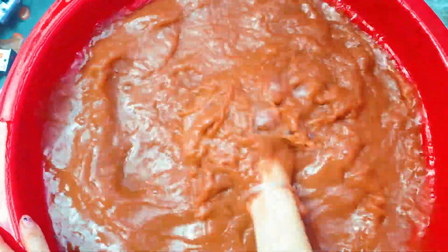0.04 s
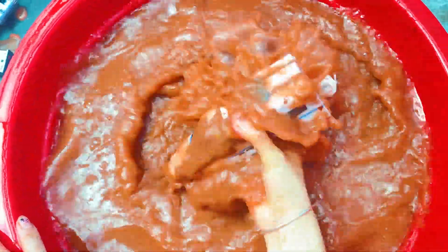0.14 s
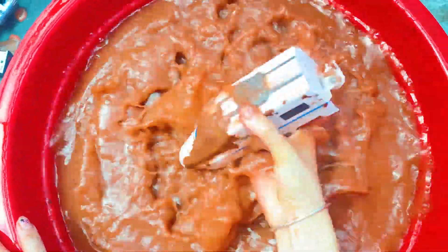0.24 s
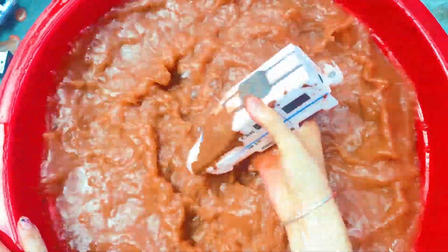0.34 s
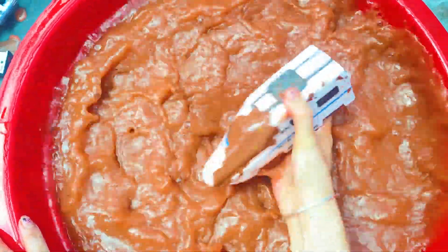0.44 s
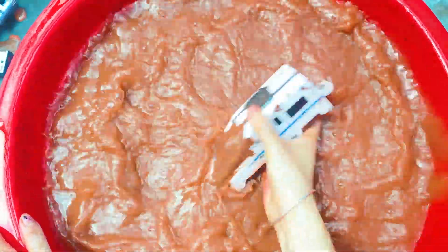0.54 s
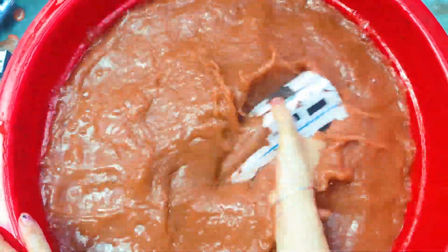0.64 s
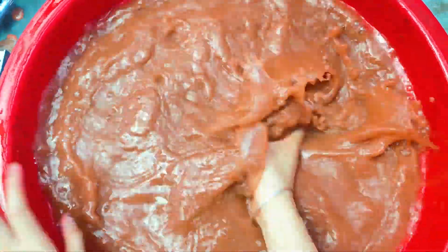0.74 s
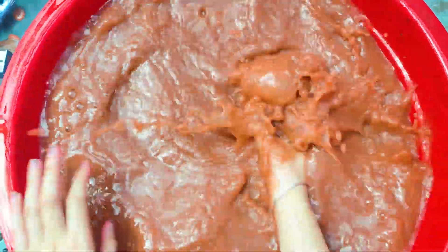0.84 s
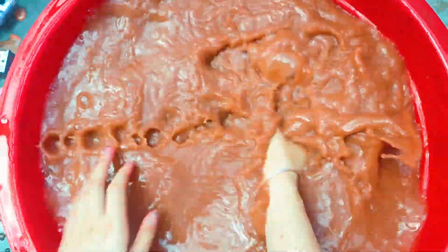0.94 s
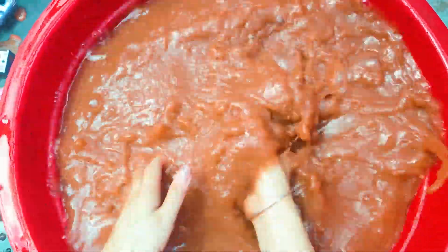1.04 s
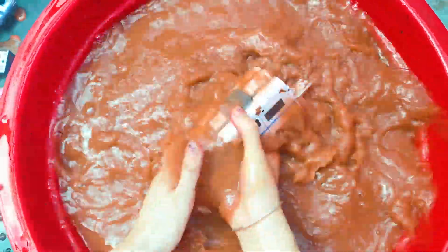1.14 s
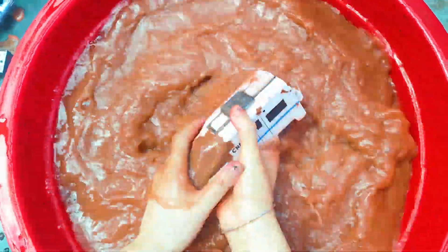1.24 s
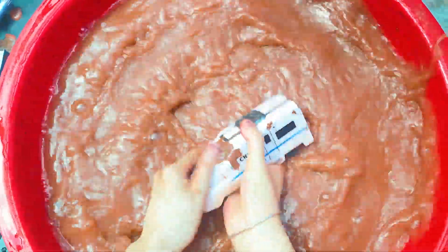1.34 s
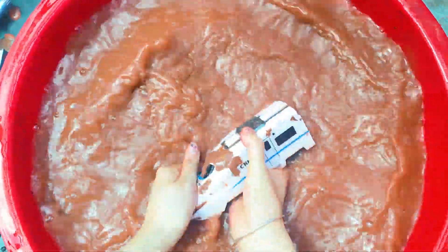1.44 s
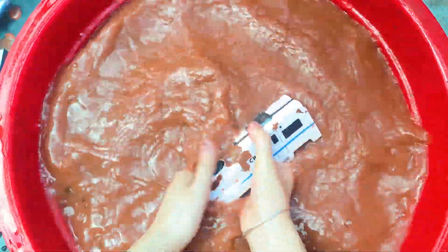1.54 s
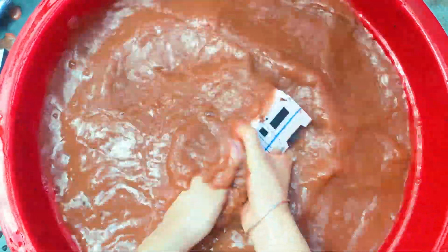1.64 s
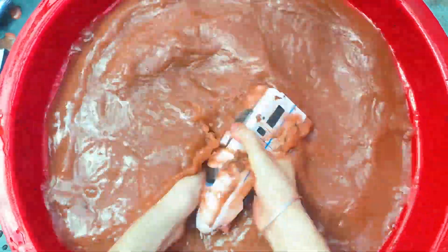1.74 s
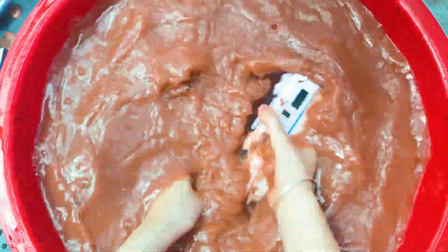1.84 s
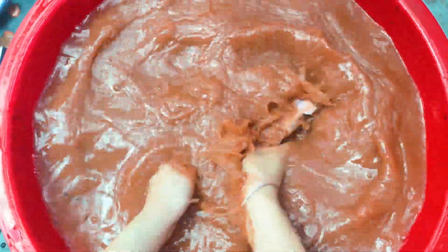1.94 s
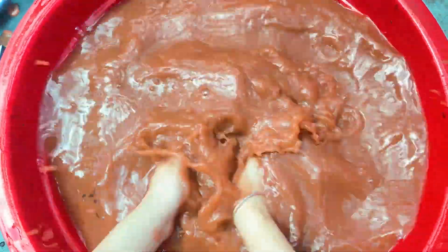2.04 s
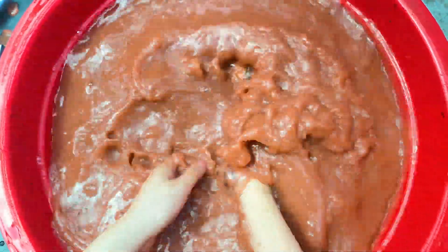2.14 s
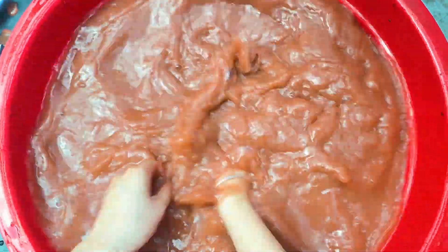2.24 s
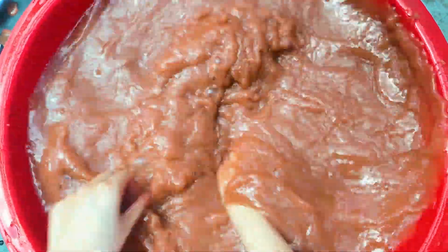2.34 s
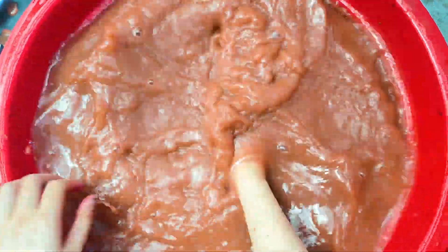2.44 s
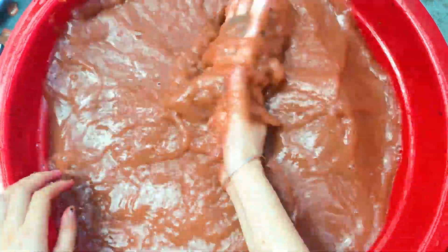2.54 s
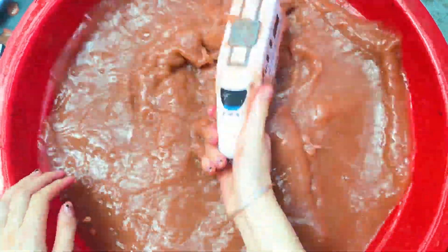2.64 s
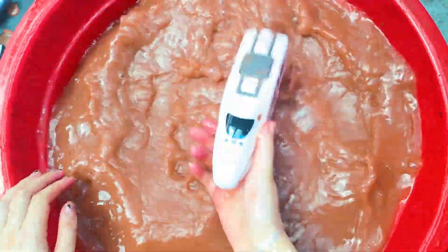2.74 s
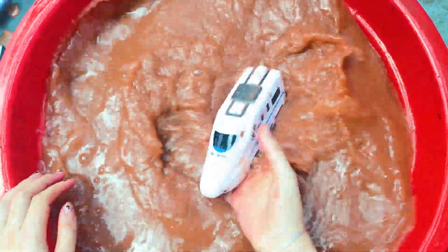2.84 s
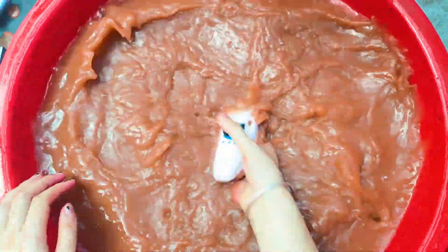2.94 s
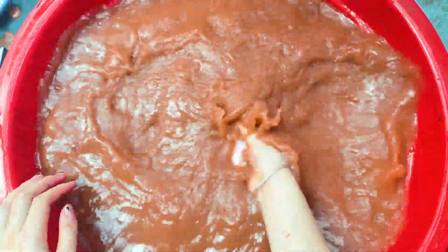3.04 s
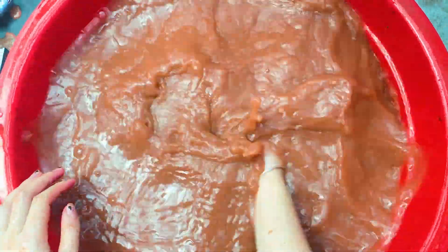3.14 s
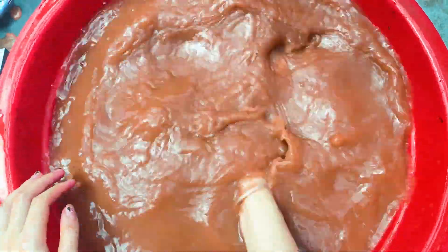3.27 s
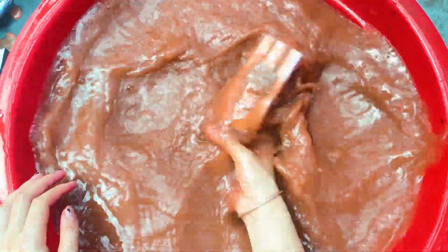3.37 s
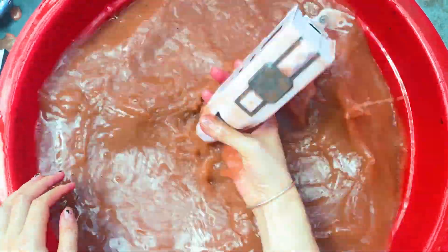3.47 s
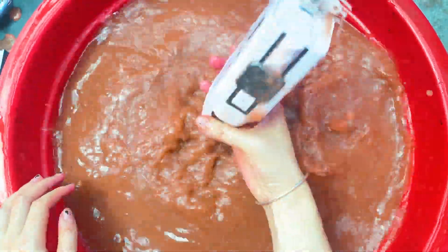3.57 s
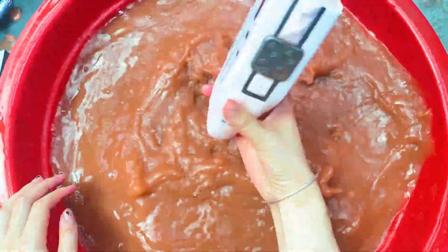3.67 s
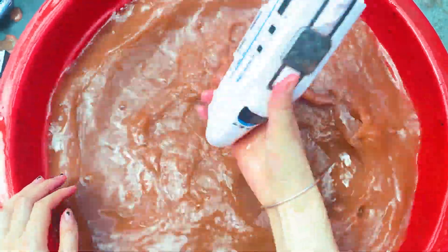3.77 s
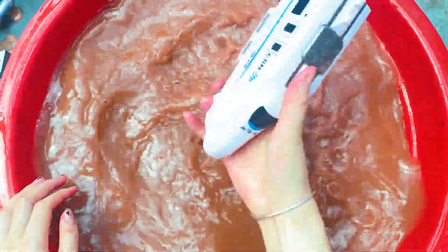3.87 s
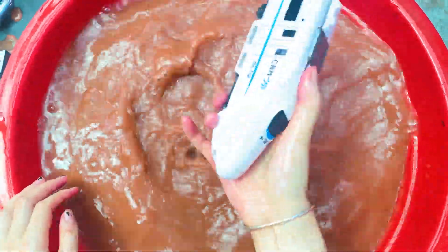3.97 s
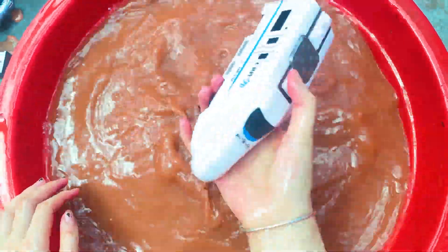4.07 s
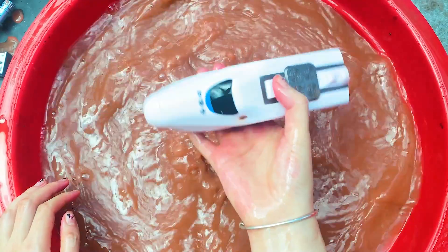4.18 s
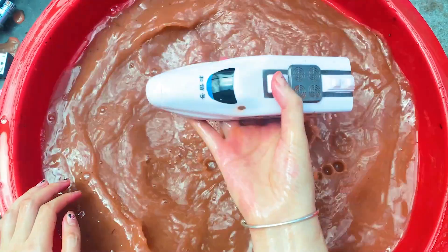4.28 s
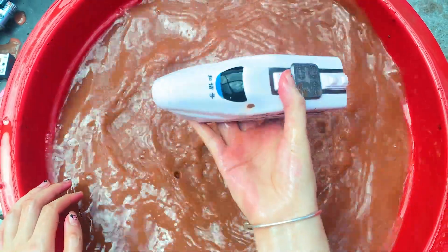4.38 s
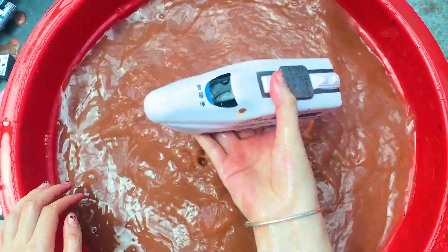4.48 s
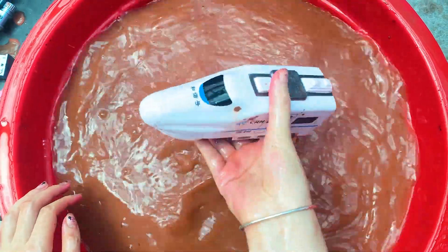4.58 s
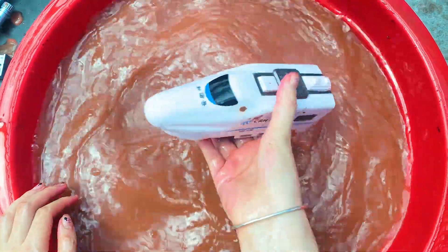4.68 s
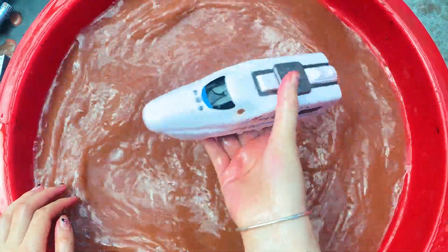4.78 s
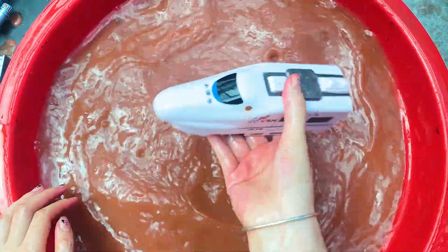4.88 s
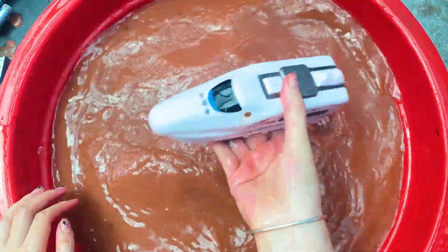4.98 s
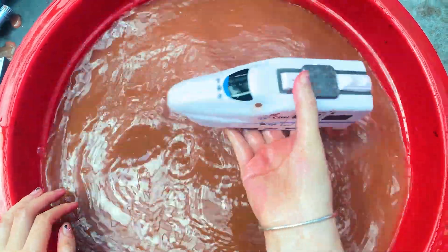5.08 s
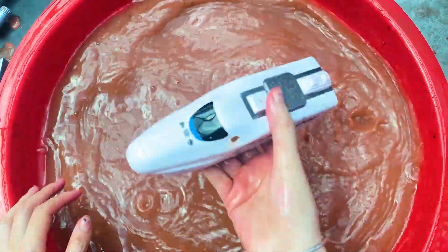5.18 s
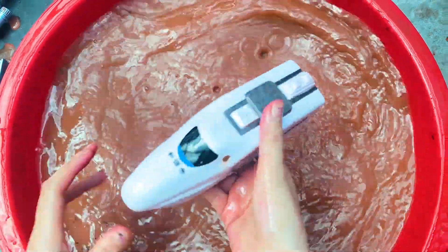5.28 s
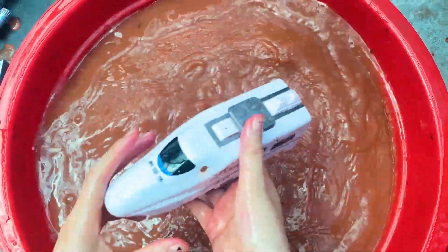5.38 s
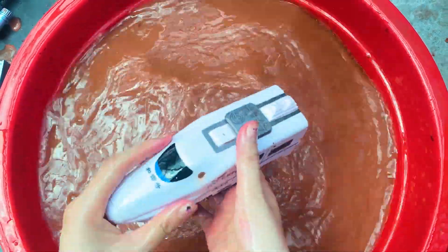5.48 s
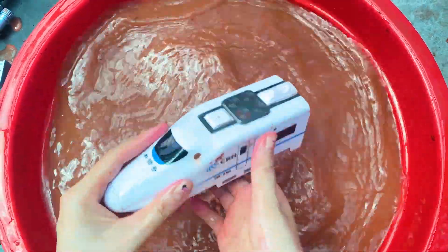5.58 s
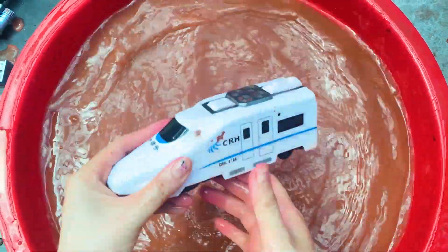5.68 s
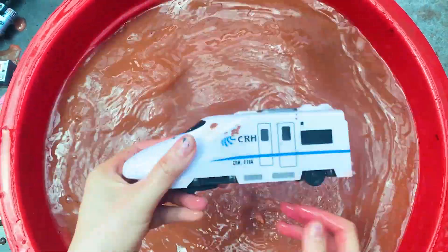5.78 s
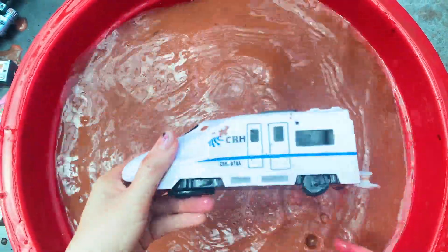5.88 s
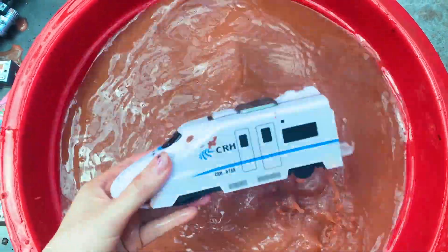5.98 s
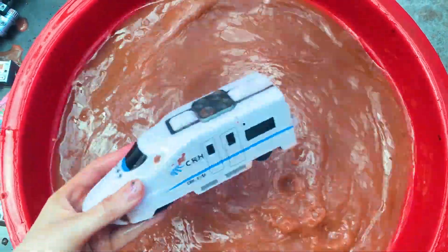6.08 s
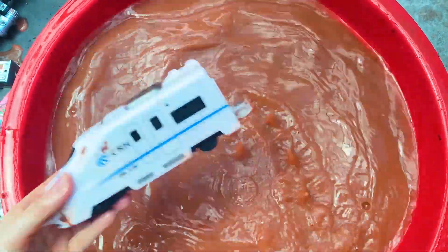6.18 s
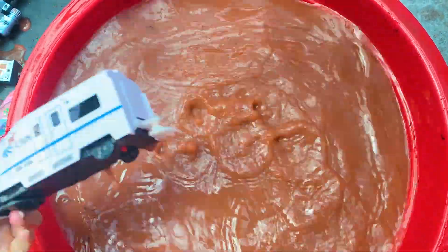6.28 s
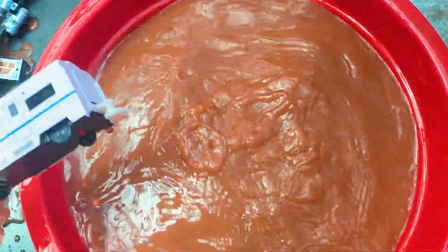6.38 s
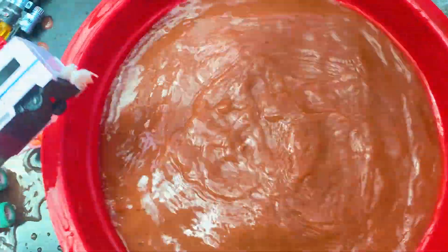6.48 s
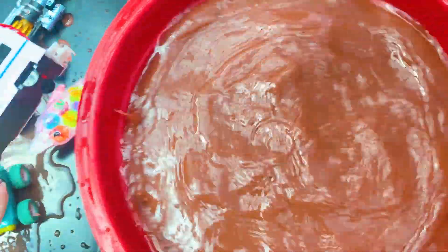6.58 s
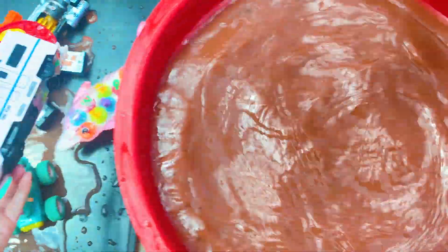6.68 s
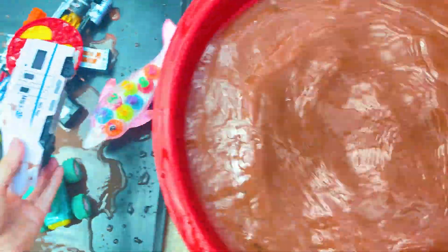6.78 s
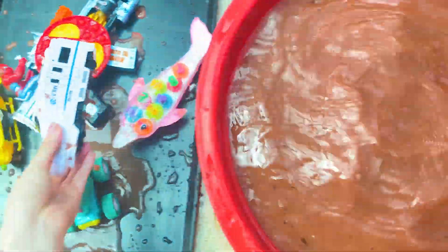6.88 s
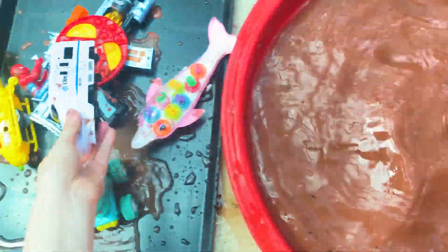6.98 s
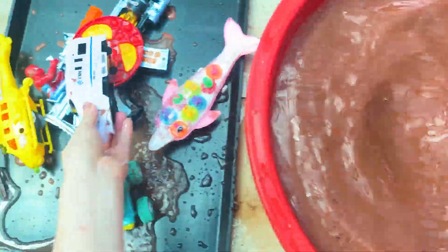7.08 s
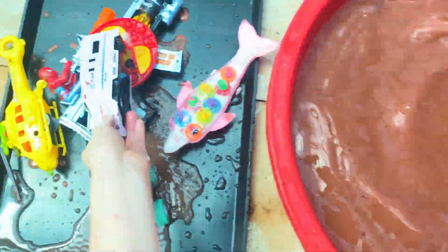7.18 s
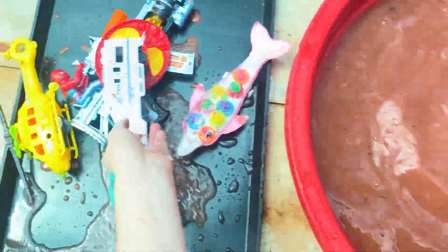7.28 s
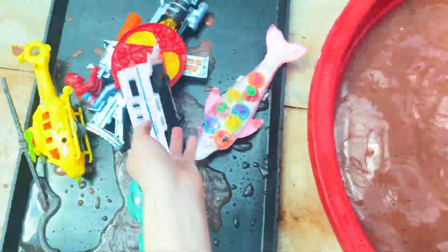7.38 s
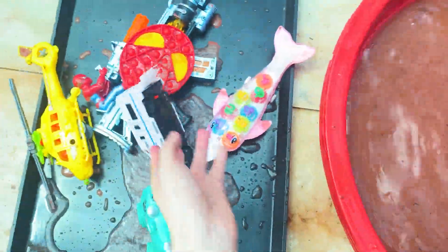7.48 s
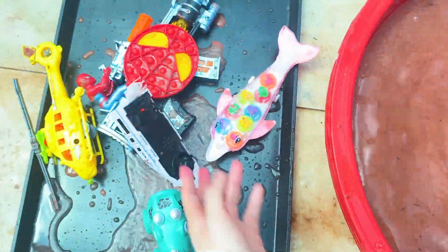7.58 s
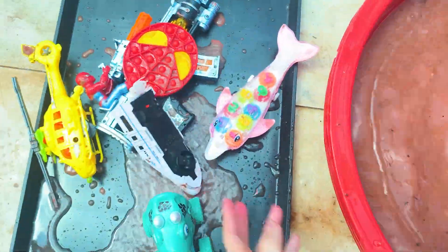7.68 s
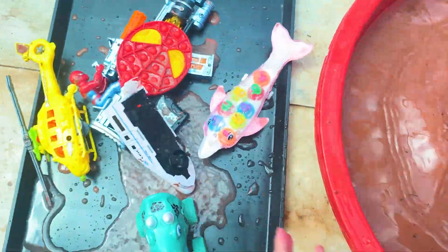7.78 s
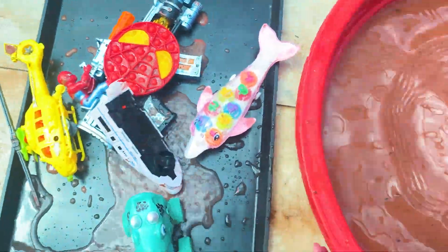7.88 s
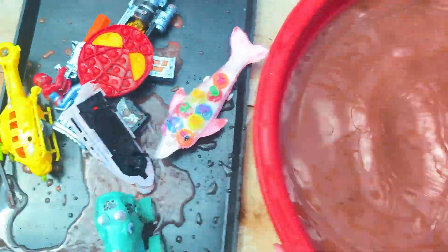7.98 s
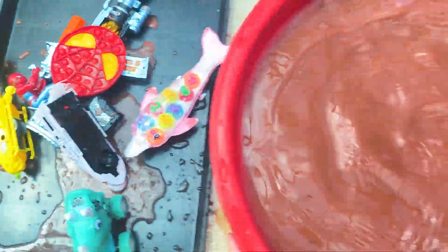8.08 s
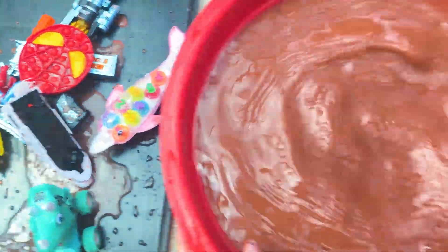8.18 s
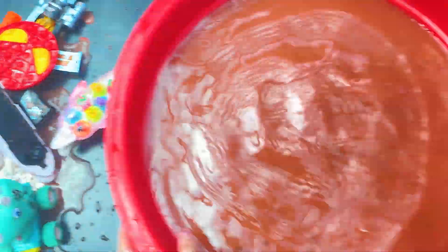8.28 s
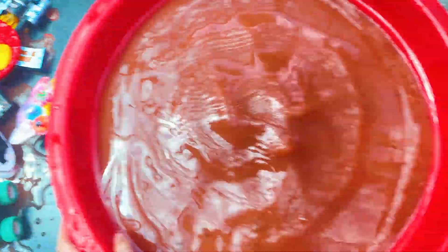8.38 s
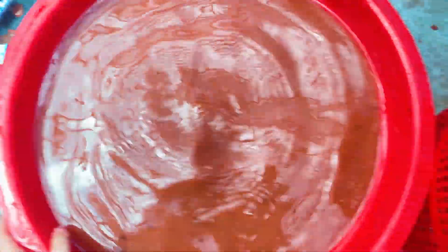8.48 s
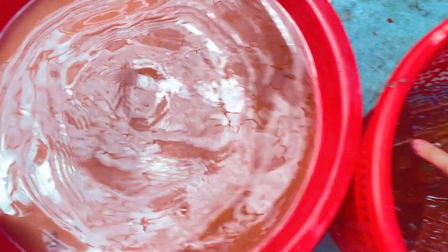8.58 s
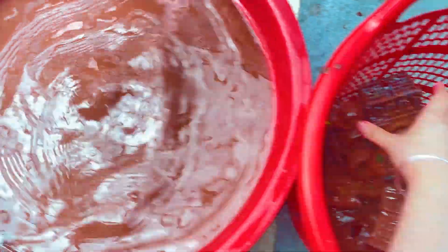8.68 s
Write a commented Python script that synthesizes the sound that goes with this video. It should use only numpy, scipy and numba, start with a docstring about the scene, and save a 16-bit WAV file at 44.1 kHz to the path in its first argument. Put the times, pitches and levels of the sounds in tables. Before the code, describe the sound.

Hands swish a hollow plastic toy through muddy water in a basin, making quick bursts of splashing, gurgling and fine spray. The toy is lifted and drains with a brief falling tone, and the sloshing thins into scattered drips and plinks. Near the end it is set among other toys on a hard tray with several light knocks. The sound is close, in a small hard room, with a faint motor droning far off.

```python
"""Small hard room, two close microphone ports. Hands swish a hollow plastic toy through muddy water in
a basin, lift it so it drains and drips, and set it down among other toys on a hard tray.
Trapped air rings as rising bubbles, drops plink, spray ticks. The emptying toy gives a falling tone;
knocks ring shell and tray modes. A motor drones far off."""
import sys
import numpy as np
from scipy import signal
from scipy.fft import rfft, irfft, next_fast_len
from scipy.io import wavfile
from numba import njit

SR = 44100
rng = np.random.default_rng(int(sys.argv[2]) if len(sys.argv) > 2 else 0)


def output_pcm(signal):
    """Save a mono or channel-first signal as 16-bit PCM at the path in sys.argv[1].

    Samples are clipped to [-1, 1] before scaling.
    """
    pcm = np.clip(np.atleast_2d(signal).T, -1, 1) * 32767
    wavfile.write(sys.argv[1], SR, np.round(pcm).astype(np.int16))


N = 384552

# Table levels are relative; each source adds its own gain.
# far rumble and air: (frequency [Hz], density [dB])
RUMBLE_SPECTRUM = [(24, -57), (40, -21.5), (101, -6.5), (297, -20), (585, -25.5), (697, -30), (751, -31.5),
                   (2700, -42.5), (9690, -60), (13800, -61), (16000, -68.5)]
# rumble width: (frequency [Hz], side minus mid [dB])
RUMBLE_WIDTH = [(60, -15), (250, -8.5), (1000, 3), (4000, -2)]
# motor drone: (frequency [Hz], rms level [dB])
MOTOR_LINES = [(49, -83.5), (62, -62.5), (98, -60), (147, -66), (195, -76)]
# hand and toy strokes: (start [s], hold [s], gurgle [dB], gurgle pitch [Hz], splash [dB], spray [dB])
STROKES = [(0.0, 0.11, -45, 492, -46, -50), (.17, 0.047, -41.5, 710, -40, -44),
           (.235, 0.051, -47.5, 720, -43.5, -56), (.28, 0.11, -45, 740, -35, -39.5),
           (0.522, 0.063, -39.5, 634, -38.5, -37), (0.658, 0.16, -50.5, 517, -44, -50),
           (.83, 0.19, -38.5, 646, -43, -43), (1.16, 0.19, -58.5, 766, -48.5, -55),
           (1.36, 0.16, -67.5, 700, -59.5, -55), (1.6, 0.31, -58.5, 497, -61, -61),
           (1.825, 0.024, -50.5, 604, -39.5, -42.5), (1.875, 0.032, -45.5, 500, -41, -33.5),
           (1.95, 0.074, -43.5, 623, -41.5, -44), (2.039, 0.06, -48.5, 790, -64, -74),
           (2.19, 0.062, -39, 523, -50, -48.5), (2.448, 0.2, -50, 894, -56, -52.5),
           (2.719, 0.1, -49, 940, -49.5, -41), (2.849, 0.08, -61.5, 500, -46, -40.5),
           (2.96, 0.08, -59.5, 504, -54, -48.5), (3.1, 0.26, -77, 1200, -92, -64),
           (3.442, 0.21, -55, 418, -47.5, -46.5), (3.71, 0.42, -61.5, 844, -41, -43),
           (4.02, 0.16, -52, 580, -50.5, -47), (4.24, 0.042, -54.5, 604, -52.5, -52),
           (4.371, 0.12, -64.5, 950, -56, -49), (4.55, 0.036, -53.5, 900, -55.5, -60),
           (4.72, 0.074, -56, 1090, -76, -62), (4.82, 0.1, -43.5, 960, -64, -54),
           (5.021, 0.083, -64.5, 800, -76, -65.5), (5.21, 0.024, -55, 912, -79, -73),
           (5.401, 0.099, -73, 1180, -79, -57.5), (5.869, 0.063, -59.5, 860, -89, -74),
           (6.0, 0.11, -60, 1040, -69, -80), (6.301, 0.21, -65, 1037, -76, -93),
           (6.997, 0.087, -65.5, 990, -72.5, -66.5), (7.252, 0.07, -57, 1040, -57.5, -81)]
# spray colour: (frequency [Hz], density [dB])
SPRAY_SPECTRUM = [(2500, -19), (4000, 0), (6000, 4.5), (8500, 14), (10500, 13), (12500, 12.5),
                  (15500, 16.5), (16200, -9), (17000, -12.5)]
# large air pockets: (time [s], level [dB], pitch [Hz], life [s])
AIR_POCKETS = [(0.029, -12.5, 482, 0.031), (0.178, -20.5, 548, 0.037), (0.205, -12.5, 720, 0.024),
               (0.254, -29, 742, 0.058), (0.3, -27.5, 692, 0.053), (0.4, -27.5, 335, 0.044),
               (0.479, -29.5, 490, 0.025), (0.518, -28.5, 490, 0.03), (0.561, -22, 944, 0.012),
               (0.646, -26, 497, 0.064), (0.745, -23.5, 537, 0.035), (0.76, -27.5, 262, 0.021),
               (0.821, -32, 503, 0.023), (0.848, -29.5, 377, 0.082), (0.896, -19.5, 628, 0.029),
               (0.95, -26.5, 420, 0.021), (0.975, -23.5, 1022, 0.035), (1.011, -17.5, 876, 0.026),
               (1.03, -30.5, 375, 0.048), (1.088, -21, 602, 0.027), (1.172, -28, 945, 0.032),
               (1.204, -18.5, 885, 0.023), (1.268, -28.5, 452, 0.015), (1.607, -37, 482, 0.026),
               (1.644, -35.5, 546, 0.022), (1.707, -38, 414, 0.056), (1.818, -21.5, 660, 0.027),
               (1.883, -27.5, 453, 0.015), (1.948, -24, 631, 0.093), (2.045, -19.5, 900, 0.021),
               (2.096, -31.5, 1230, .03), (2.188, -18, 1140, 0.013), (2.204, -18.5, 434, 0.037),
               (2.232, -35.5, 735, 0.033), (2.282, -31, 417, 0.064), (2.299, -19.5, 695, 0.03),
               (2.322, -28, 818, 0.05), (2.476, -29, 1300, 0.03), (2.7, -29.5, 756, .024),
               (2.783, -32.5, 827, 0.087), (2.833, -29, 428, 0.028), (2.892, -36.5, 416, 0.061),
               (2.93, -33, 420, 0.029), (3.03, -28, 1340, 0.019), (3.438, -29, 366, 0.026),
               (3.476, -30, 1030, 0.012), (3.533, -17, 400, 0.026), (3.725, -33.5, 1312, 0.056),
               (3.948, -36.5, 549, 0.081), (4.071, -30, 533.5, 0.025), (4.097, -28.5, 670, .027),
               (4.139, -36, 646, 0.1), (4.252, -29.5, 550, 0.04), (4.453, -37, 1110, 0.027),
               (4.699, -40, 1108, 0.097), (4.593, -39, 1286, 0.025), (4.819, -31.5, 1173, 0.019),
               (4.887, -28.5, 1073, 0.03), (4.918, -28, 1120, 0.025), (4.966, -29.5, 1124, 0.033),
               (4.95, -27, 790, 0.02), (5.24, -45, 920, 0.053), (5.882, -45.5, 900, 0.035),
               (5.979, -38, 880, 0.019), (6.026, -28, 1450, 0.01), (6.06, -43, 1054, 0.068),
               (6.3, -54.5, 1054, 0.22)]
# bursting droplets: (time [s], level [dB], pitch [Hz])
DROPLET_BURSTS = [(0.0941, -24, 5870), (0.175, -39, 5300), (0.2463, -21, 12050), (0.297, -22, 6600),
                  (0.327, -19, 7400), (0.3405, -18.5, 5300), (0.4433, -20.5, 5740), (0.529, -25, 7500),
                  (0.5578, -14, 6680), (0.653, -23.5, 4900), (0.688, -28, 12700), (0.754, -23, 11300),
                  (0.8757, -23.5, 12300), (0.9392, -24.5, 12000), (0.9602, -19.5, 4800),
                  (1.003, -25, 12300), (1.0086, -17, 10900), (1.127, -34, 7100), (1.158, -33, 11500),
                  (1.497, -32, 12800), (1.9579, -21.5, 6640), (1.978, -26, 4540), (2.243, -17.5, 8780),
                  (2.5642, -20.5, 12200), (2.589, -35, 5130), (2.7117, -33, 7650), (2.8366, -22, 7500),
                  (2.8827, -16, 12600), (2.9136, -19, 12000), (3.0056, -28.5, 11000), (3.324, -31.5, 6470),
                  (3.381, -31, 10300), (3.572, -21.5, 7500), (3.7185, -25.5, 6860), (3.8815, -25, 6670),
                  (3.9628, -24, 7800), (4.11, -27, 7100), (4.139, -25.5, 4900), (4.1736, -22, 11600),
                  (4.3678, -31, 10300), (4.4857, -24, 8550), (4.7676, -34, 11600), (5.28, -43, 11900),
                  (5.4026, -30.5, 7900), (5.455, -32.5, 5800), (5.599, -50, 5540), (5.645, -46.5, 6600),
                  (5.957, -55, 12300), (5.996, -36.5, 8300), (6.0137, -44, 7100), (6.0309, -22.5, 4540),
                  (6.07, -33, 12800), (6.081, -34, 7340), (6.12, -33.5, 5370), (6.172, -41.5, 8300),
                  (6.211, -46.5, 6140), (6.254, -52, 12100), (6.271, -44.5, 5040), (6.318, -45.5, 6600),
                  (6.36, -59, 12000), (6.627, -48, 6680), (7.011, -43, 12000), (7.264, -41, 6100)]
# falling drops: (time [s], level [dB], pitch [Hz], life [s])
DROP_PLINKS = [(0.095, -23.5, 2970, 0.011), (0.144, -24.5, 1680, 0.0069), (0.175, -23.5, 1260, 0.0082),
               (0.2053, -17, 1148, 0.0097), (0.299, -14, 2820, 0.0014), (0.342, -21, 2940, 0.0074),
               (0.387, -16.5, 1416, 0.014), (0.4259, -27.5, 2030, 0.013), (0.5253, -30, 2830, 0.013),
               (0.5609, -10.5, 1780, 0.0033), (0.669, -31, 2030, 0.015), (0.6887, -29.5, 2790, 0.016),
               (0.7755, -19.5, 2360, 0.01), (1.172, -30.5, 3130, 0.0071), (1.2023, -33.5, 2930, 0.013),
               (1.3024, -23.5, 1610, 0.011), (1.5544, -37.5, 2300, 0.0075), (1.6816, -33, 2440, 0.013),
               (1.759, -33.5, 2110, 0.015), (1.82, -26.5, 1426, 0.011), (1.8397, -26, 2700, 0.014),
               (1.8668, -25, 2350, 0.014), (1.9488, -20, 1830, 0.0038), (2.2998, -23.5, 2860, 0.0089),
               (2.614, -30, 1820, 0.014), (2.7809, -21, 1780, 0.0018), (2.833, -23.5, 2320, 0.0062),
               (2.8825, -15.5, 3040, 0.0042), (2.902, -26, 2785, 0.012), (2.939, -33.5, 2400, 0.025),
               (2.9703, -30, 1780, 0.02), (2.988, -27, 1850, 0.0083), (3.075, -35, 2300, 0.0069),
               (3.086, -35, 2390, 0.0056), (3.147, -45, 1405, 0.01), (3.3216, -37, 2290, 0.0064),
               (3.4104, -29.5, 3430, 0.0082), (3.4556, -22, 3820, 0.012), (3.565, -20, 2890, 0.0036),
               (3.6273, -25.5, 1570, 0.016), (3.6645, -20.5, 2100, 0.0036), (3.73, -34.5, 1460, 0.03),
               (3.917, -19, 1590, 0.011), (3.93, -22.5, 1880, 0.012), (3.958, -24.5, 1950, 0.012),
               (3.995, -29, 2270, 0.0056), (4.098, -34.5, 1830, 0.0086), (4.193, -35, 2750, 0.006),
               (4.222, -37, 2300, 0.0062), (4.234, -30.5, 3650, 0.0055), (4.293, -35.5, 4200, 0.0054),
               (4.2823, -26.5, 2460, 0.0029), (4.451, -37.5, 2290, 0.0063), (4.46, -32, 2430, 0.0054),
               (4.488, -45, 1900, 0.01), (4.5314, -30, 2180, 0.013), (4.563, -38, 1880, 0.016),
               (4.6132, -23.5, 2500, 0.0018), (4.634, -38, 2180, 0.011), (4.665, -45, 2570, 0.021),
               (4.7003, -37.5, 2940, 0.013), (4.766, -41, 1380, 0.036), (4.837, -40, 2880, 0.012),
               (4.877, -34, 2350, 0.0062), (4.92, -46, 4200, 0.0065), (5.4946, -38.5, 1940, 0.0092),
               (5.534, -39, 1286, 0.016), (5.5471, -25, 1520, 0.0043), (5.7058, -33, 1494, 0.019),
               (6.2919, -40.5, 1930, 0.04)]
# air resonance of the draining toy: (time [s], pitch [Hz], level [dB])
DRAIN_GLIDE = [(3.684, 1500, -68.5), (3.741, 1250, -58), (3.798, 900, -62), (3.857, 676, -43),
               (3.933, 573, -41), (4.0, 437.7, -41), (4.06, 419, -47), (4.1, 375, -97.5)]
# toy on tray and toys: (time [s], shell [dB], tray [dB], crack [dB], shell tilt [dB/oct])
TOY_KNOCKS = [(7.302, -16.5, -25.5, -23, 16.5), (7.4, -19, -41, -41.5, -1.5), (7.417, -17, -22, -28, 5),
              (7.47, -23.5, -26.5, -37.5, 3.5), (7.512, -37, -31.5, -48, -18.5),
              (7.544, -21, -32.5, -38.5, 4.5), (7.565, -30, -56.5, -40.5, -13.5),
              (7.635, -6, -62, -25, -12), (7.662, -35.5, -46, -36, -0.5), (7.704, -26, -42, -42.5, -3),
              (7.761, -36, -70, -57, -17)]
# hollow shell: (frequency [Hz], level [dB], T60 [s])
SHELL_MODES = [(645, -30, 0.028), (822, -17.5, .025), (867, -8.5, 0.031), (898, 6, 0.035), (986, 6, 0.014),
               (1070, 0.5, 0.024), (1245, 7, 0.025), (1470, -6, 0.012), (1700, -2, 0.02),
               (1920, -5.5, 0.018), (2190, -1, 0.0099)]
# hard tray: (frequency [Hz], level [dB], T60 [s])
TRAY_MODES = [(328, -18.5, 0.0416), (390, 2, 0.11), (435, 2.5, 0.035), (515, 6, 0.021)]
# echo width: (frequency [Hz], side minus mid [dB])
ECHO_WIDTH = [(200, -10.5), (1000, 2), (4000, 4), (6500, 5), (9000, -11.5), (16000, -12)]
# phase between ports: (frequency [Hz], left lead [rad])
PORT_PHASE = [(0, 0), (950, -0.2), (3360, 0.8), (4220, 0.1), (6720, 0.3), (7580, -0.0), (9040, -2.7),
              (9820, -3.3), (11500, -6.2), (12300, -6.7), (13600, -9.1), (14500, -9.7), (15800, -12.2),
              (16700, -12.7)]

RUMBLE_DB, CALM_DB, RUSH_RE_SPLASH_DB = -56, -94, -10
SWELL_DB_PER_S, SETTLE_DB_PER_S = 505, 134
RISE_OCT, RISE_SPREAD_OCT = 0.75, 0.054   # climb of a 600 Hz, -28.5 dB pocket
RISE_LOSS_OCT_PER_OCT, RISE_OCT_PER_DB = 0.08, 1.1
ROOM_DB, ROOM_T60_S, TREBLE_T60_S, WALL_CUT_HZ = -7, 0.21, 0.28, 3700
LATE_HZ, LATE_T60_S, LATE_DB = 1000, 0.44, -8.5
STOPBAND_HZ = 16900


def from_db(db):
    return 10 ** (np.asarray(db) / 20)


def unit_rms(x):
    return x / np.sqrt(np.mean(x ** 2) + 1e-20)


def butter(x, order, hz, kind="low"):
    return signal.sosfilt(signal.butter(order, hz, kind, fs=SR, output="sos"), x)


def coloured(x, spectrum):
    """Filter by (Hz, dB) points on a log frequency axis."""
    size = next_fast_len(N)
    bins_hz = np.fft.rfftfreq(size, 1 / SR) + 1
    hz, db = np.transpose(spectrum)
    gain = from_db(np.interp(np.log(bins_hz), np.log(hz), db))
    return irfft(rfft(x, size) * gain, size)[..., :N]


def drift(rate_hz):
    """Slow noise, rms 1: double one-pole low-pass at SR / 40."""
    pole = np.exp(-80 * np.pi * rate_hz / SR)
    slow = signal.lfilter([1], [1, -2 * pole, pole * pole], rng.standard_normal(N // 40 + 2002))[2000:]
    return np.interp(np.arange(N) / 40, np.arange(len(slow)), unit_rms(slow))


def ring(force, hz, t60_s):
    """One mode: unit click in, decaying unit sine out."""
    r, w = from_db(-60 / (t60_s * SR)), 2 * np.pi * hz / SR
    return signal.lfilter([0, np.sin(w)], [1, -2 * r * np.cos(w), r * r], force + 1e-18)


def clicks(time_s, db):
    out = np.zeros(N)
    np.add.at(out, (np.asarray(time_s) * SR).astype(int), from_db(db))
    return out


def puffs(time_s, db, t60_s):
    """Noise bursts: fast swell, exponential decay."""
    decay = signal.lfilter([1], [1, -from_db(-60 / (t60_s * SR))], clicks(time_s, db))
    pole = from_db(-60 / (0.36 * t60_s * SR))
    return signal.lfilter([1 - pole], [1, -pole], decay) * rng.standard_normal(N)


@njit
def add_bubbles(out, start, height, hz, life_s, rise_oct, pan, swell_rad, hold):
    """Each bubble swells, holds, dies; pitch climbs as it nears the surface."""
    for k in range(len(start)):
        phase, length = 0.0, life_s[k] * SR
        for i in range(min(int(length), out.shape[1] - start[k])):
            age = i / length
            pitch_hz = min(hz[k] * 2 ** (rise_oct[k] * (age - 0.25)), 0.4 * SR)
            phase += 2 * np.pi * pitch_hz / SR
            envelope = (1 - np.exp(-phase / swell_rad)) * 1000.0 ** (-age ** hold)
            sample = height[k] * envelope * np.sin(phase)
            out[0, start[k] + i] += sample * pan[k]
            out[1, start[k] + i] += sample / pan[k]


def bubbles(time_s, db, hz, life_s, rise_oct, swell_rad, hold):
    """Stereo bubbles, scattered slightly left of centre."""
    out = np.zeros((2, N))
    pan_db = 1.8 + 3.0 * rng.standard_normal(len(time_s))
    add_bubbles(out, (time_s * SR).astype(np.int64), from_db(db), hz, np.clip(life_s, 0.001, 0.3),
                np.full(len(time_s), rise_oct), from_db(pan_db / 2), swell_rad, hold)
    return out


def swarm(centre_hz, spread_oct, cycles, uneven_db, count):
    """Randomly timed bubbles about a centre pitch, uneven in level; rms 1."""
    time_s = rng.random(count) * (N - 1) / SR
    size = rng.exponential(1, count)
    detune, climb = rng.standard_normal((2, count))
    start = (time_s * SR).astype(int)
    hz = np.broadcast_to(centre_hz, N)[start] * 2 ** (spread_oct * detune)
    db = uneven_db * np.minimum(size, 3) + 3.0 * drift(18)[start]
    return unit_rms(bubbles(time_s, db, hz, cycles / hz, 0.17 + 0.38 * climb, swell_rad=18.0, hold=1.6))


def far_motor():
    """Wavering drone lines over far rumble and air, narrow in the bass."""
    mid, side = coloured(rng.standard_normal((2, N)), RUMBLE_SPECTRUM)
    side = coloured(side, RUMBLE_WIDTH)
    rumble = from_db(RUMBLE_DB) * unit_rms(np.array([mid + side, mid - side]))
    drone = sum(from_db(db) * unit_rms(ring(rng.standard_normal(N), hz, 0.73)) for hz, db in MOTOR_LINES)
    return rumble + drone


def hand_strokes():
    """Water swells, holds, settles per stroke: three level curves and a power-weighted pitch."""
    t = np.arange(0, N + 64, 64) / SR
    start_s, hold_s, gurgle_db, hz, splash_db, spray_db = np.transpose(STROKES)[:, :, None]
    swell_db = SWELL_DB_PER_S * (t - start_s)
    settle_db = SETTLE_DB_PER_S * (start_s + hold_s - t)
    shape_db = np.minimum(0, np.minimum(swell_db, settle_db))
    powers = [from_db(2 * (db + shape_db)) + 1e-30 for db in (gurgle_db, splash_db, spray_db)]
    pitch_hz = np.sum(powers[0] * hz, axis=0) / np.sum(powers[0], axis=0)
    levels_db = [10 * np.log10(np.sum(power, axis=0) + from_db(2 * CALM_DB)) for power in powers]
    return [np.interp(np.arange(N) / SR, t, curve) for curve in (*levels_db, pitch_hz)]


def gurgle(db, pitch_hz):
    """Stirred-in air rings as low bubbles."""
    return from_db(db) * swarm(pitch_hz, spread_oct=0.3516, cycles=16, uneven_db=3, count=3500)


def splash(db):
    """Small bubbles over a smooth rush of water."""
    small = from_db(db) * swarm(2300, spread_oct=0.65, cycles=22, uneven_db=6.3, count=9000)
    rush = unit_rms(butter(rng.standard_normal(N), 1, [1300, 5500], "band"))
    return small + from_db(db + RUSH_RE_SPLASH_DB + 7.7 * drift(17)) * rush


def spray(db):
    """Clumps of tiny bursts over hiss; tiny bubbles fizz."""
    rate_per_s = 500 * from_db(6.0 * drift(20))
    born = rng.random(N) < rate_per_s / SR
    grains = born * from_db(2.7 * np.minimum(rng.exponential(1, N), 5)) * rng.choice([-1, 1], N)
    hiss = 0.28 * rng.standard_normal((2, N))
    clumps = from_db(5.0 * drift(36))
    mist = unit_rms(coloured((unit_rms(grains) + hiss) * clumps, SPRAY_SPECTRUM))
    fizz = swarm(7000, spread_oct=0.67, cycles=28, uneven_db=12, count=3000)
    return from_db(db) * mist + from_db(db - 12) * fizz


def air_pockets():
    """Large bubbles; low, loud ones climb most. Thick mud makes them wobble."""
    time_s, db, hz, life_s = np.transpose(AIR_POCKETS)
    rise_oct = RISE_OCT - RISE_LOSS_OCT_PER_OCT * np.log2(hz / 600) + RISE_OCT_PER_DB * (db + 28.5)
    rise_oct += RISE_SPREAD_OCT * rng.standard_normal(len(time_s))
    pockets = bubbles(time_s, db - 4.5, hz, life_s, np.clip(rise_oct, 0.1, 1.2), swell_rad=2.5, hold=2.72)
    return pockets * from_db(3.63 * drift(88))


def droplet_ticks():
    """Bursting droplets: ping plus noise, the smallest mainly in the top octave."""
    time_s, db, hz = np.transpose(DROPLET_BURSTS)
    pings = bubbles(time_s, db - 1, hz, life_s=26 / hz, rise_oct=0.6, swell_rad=37.0, hold=3.0)
    tilt_db = 8 * np.clip(np.log2(hz / 7000), 0, 1)
    body = butter(puffs(time_s, db - 10.5 - tilt_db, t60_s=0.012), 4, 9500)
    top = butter(puffs(time_s, db - 15.5 + tilt_db, t60_s=0.01), 4, 9500, "high")
    return pings + coloured(body + top, SPRAY_SPECTRUM)


def drops():
    """Each drop slaps the surface and rings a bubble with a fluttering level."""
    time_s, db, hz, life_s = np.transpose(DROP_PLINKS)
    plinks = bubbles(time_s, db - 0.5, hz, life_s, rise_oct=0.35, swell_rad=5.6, hold=2.37)
    plinks *= from_db(2.2 * drift(200))
    slaps = butter(puffs(time_s, db - 0.5, t60_s=0.022), 3, [1200, 4000], "band")
    return plinks + slaps


def drain():
    """Splashes inside the toy excite its air space: a fluttering tone, deeper as it empties."""
    time_s, hz, db = np.transpose(DRAIN_GLIDE)
    t = np.arange(N) / SR
    phase = 2 * np.pi * np.cumsum(np.interp(t, time_s, hz)) / SR
    envelope = from_db(np.interp(t, time_s, db, left=-99, right=-99))
    return envelope * (drift(45) * np.sin(phase) + drift(45) * np.cos(phase))


def toy_knocks():
    """Each knock rings shell and tray modes, rattles briefly and cracks."""
    time_s, shell_db, tray_db, crack_db, tilt_db_per_oct = np.transpose(TOY_KNOCKS)
    count, out = len(time_s), np.zeros(N)
    for hz, db, t60_s in SHELL_MODES:
        spot_db = rng.normal(0, 2.0, count)   # where the blow lands
        blow_db = shell_db - 13.5 + db + tilt_db_per_oct * np.log2(hz / 1000) + spot_db
        blows = clicks(time_s + rng.uniform(0, 0.001, count), blow_db)
        rattle = puffs(time_s, blow_db - 24.5, t60_s=0.089)
        out += ring(blows + rattle, hz, t60_s)
    for k, (hz, db, t60_s) in enumerate(TRAY_MODES):
        lag_s = rng.uniform(0.0011, 0.0052, count)
        spot_db = rng.normal(0, 2.0, count)
        blows = clicks(time_s + lag_s, tray_db - 5.5 + db + spot_db)
        out += (-1) ** k * ring(blows, hz, t60_s)
    out += butter(puffs(time_s, crack_db + 7, t60_s=0.029), 1, [1500, 7000], "band")
    out = butter(out, 2, 300, "high")   # light toys carry no bass
    return out * from_db([[2.2], [-2.2]])   # left of centre


def room(x):
    """Dense echoes; the middle range is widest and lingers."""
    t = np.arange(SR // 2) / SR
    echoes = rng.standard_normal((2, len(t))) * (t > 0.004)
    low = butter(echoes, 1, WALL_CUT_HZ)
    treble = echoes - low
    mid, side = low * from_db(-60 * t / ROOM_T60_S) + treble * from_db(-2.5 - 60 * t / TREBLE_T60_S)
    late = butter(echoes[0], 1, [LATE_HZ / 2, LATE_HZ * 2], "band")
    mid = mid + late * from_db(LATE_DB - 60 * t / LATE_T60_S) * (1 - np.exp(-t / 0.059))
    side = coloured(side, ECHO_WIDTH)[:len(t)]
    tail = np.array([mid + side, mid - side])
    tail /= np.sqrt(np.sum(tail ** 2) / 2)
    return signal.fftconvolve(x[None], tail, axes=1)[:, :N]


def scene():
    """Near basin and tray, too small to radiate deep bass; room; far motor."""
    gurgle_db, splash_db, spray_db, pitch_hz = hand_strokes()
    water = gurgle(gurgle_db, pitch_hz) + splash(splash_db) + air_pockets()
    water += drops() + spray(spray_db) + droplet_ticks()
    near = butter(water + drain() + toy_knocks(), 3, 230, "high")
    return near + from_db(ROOM_DB) * room(near.mean(axis=0)) + far_motor()


def record(dry):
    """Two ports, differing in treble phase; steep top cut."""
    size = next_fast_len(N + 1024)
    lead_rad = np.interp(np.fft.rfftfreq(size, 1 / SR), *np.transpose(PORT_PHASE))
    phase_shift = np.exp(1j * np.outer([0, -1], lead_rad))
    ports = irfft(rfft(dry, size) * phase_shift, size)[:, :N]
    return signal.sosfilt(signal.cheby2(12, 70, STOPBAND_HZ, fs=SR, output="sos"), ports)


dry = scene()
out = record(dry)
output_pcm(out)
```